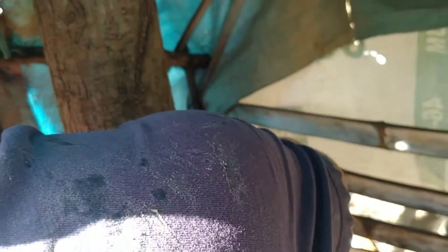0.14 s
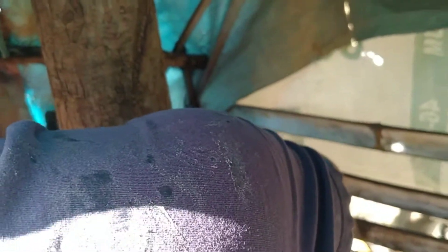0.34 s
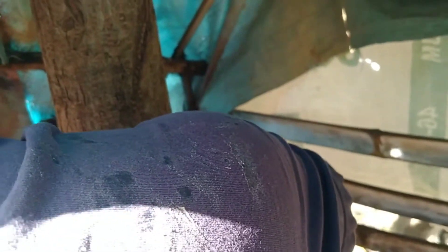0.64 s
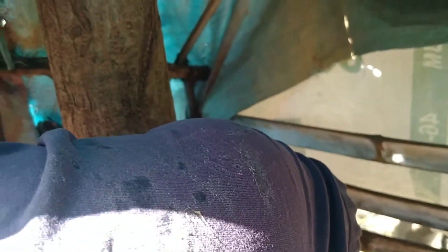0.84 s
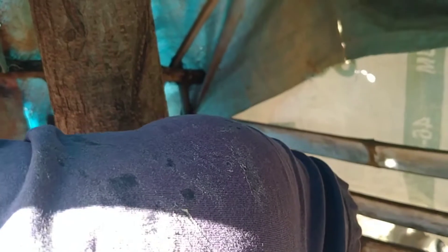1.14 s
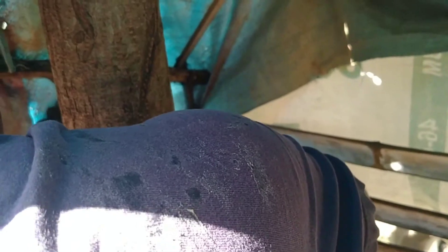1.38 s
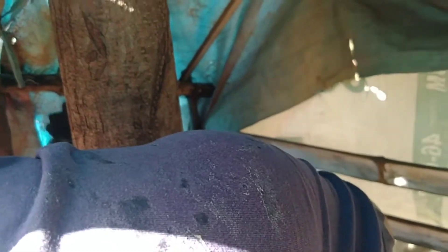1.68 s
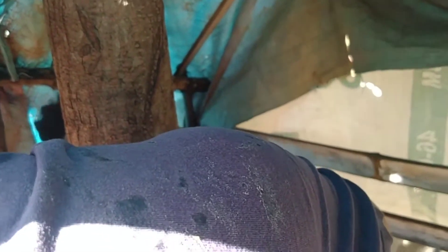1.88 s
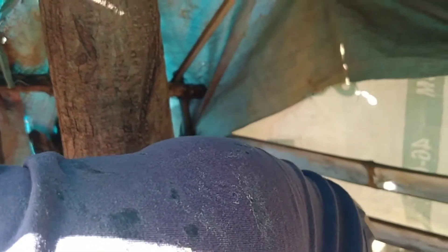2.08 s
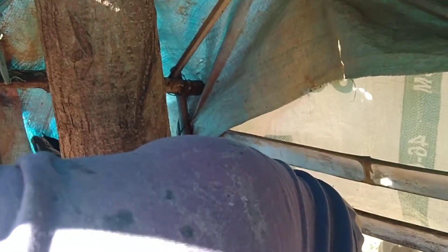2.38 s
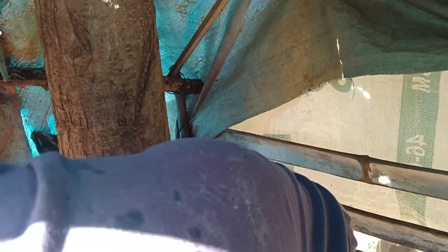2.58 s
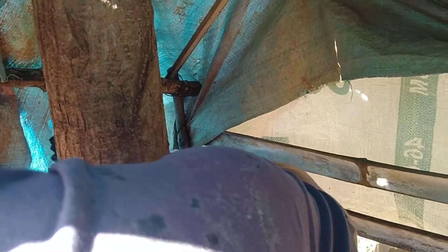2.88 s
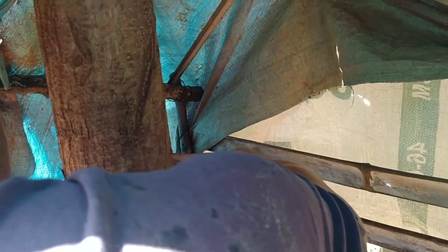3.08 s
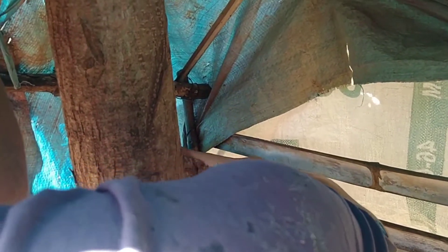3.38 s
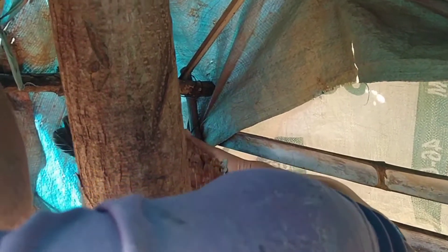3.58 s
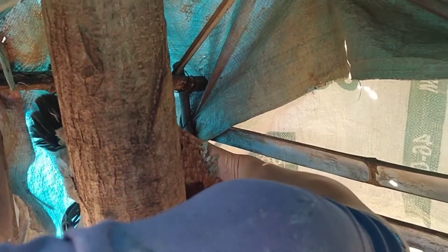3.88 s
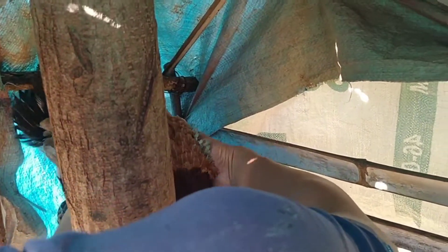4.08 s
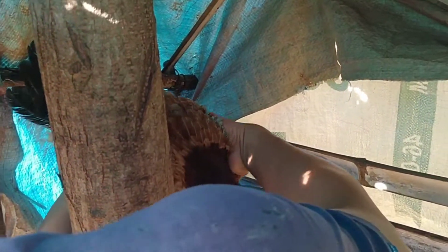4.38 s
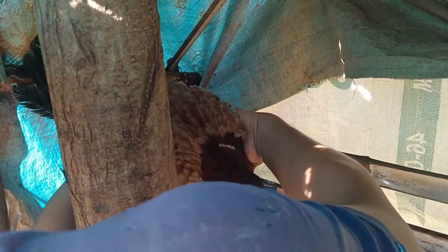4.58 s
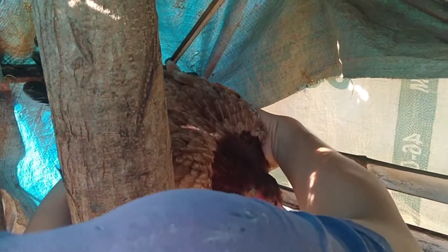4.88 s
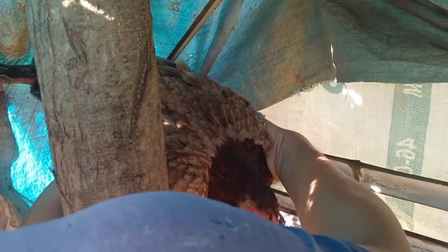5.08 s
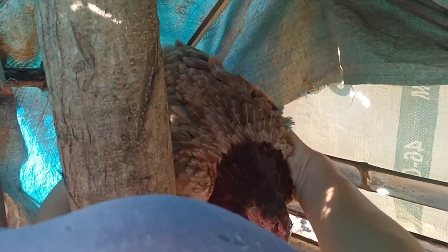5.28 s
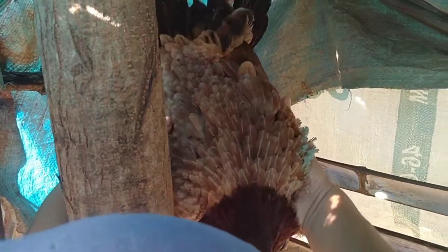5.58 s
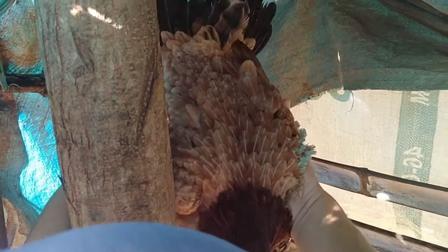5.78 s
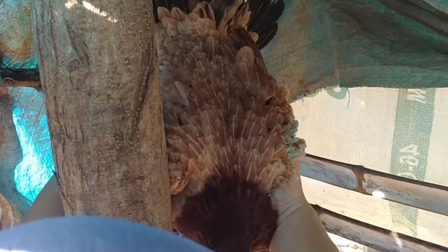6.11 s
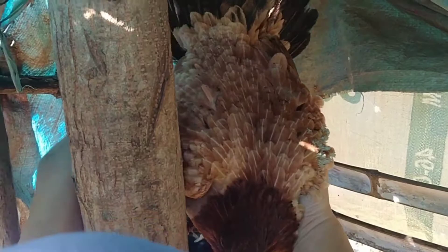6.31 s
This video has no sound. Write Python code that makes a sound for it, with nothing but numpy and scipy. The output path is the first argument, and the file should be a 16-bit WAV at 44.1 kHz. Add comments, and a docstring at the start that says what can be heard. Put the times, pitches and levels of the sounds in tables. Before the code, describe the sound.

A close microphone in a small tarpaulin coop picks up quiet outdoor air and a constant faint straw crackle. A short double cluck opens, then a hen growls at 0.3, 1.0, 1.9 and 2.8 seconds, each under half a second, a fast throaty flutter between a low and a brighter note. Chicks peep thinly and glide downward throughout, with brief trills near 1, 1.7 and 2.2. Very faint distant fowl calls come at 1.5 and 2.4. At 3.5 the longest growl, strong and nearly 0.8 seconds, comes with soft cloth rumble; clucks follow at 4.2. Peeps crowd in from 3.9 to 5.6. Another strong growl comes at 4.8, then one at 5.4 with a straw burst and sharp snap. A stuttering cluck at 5.8 precedes a small gritty scrape at 6.1 and a last low, weak, hoarse growl at 6.2, with a clear chick trill and rustling.

```python
"""Broody hen lifted off her nest

A hen growls eight times in a small tarpaulin coop, with throaty clucks between. Her voice is a whistle
that flutters 52 to 63 times a second between a low arching note and a higher one.
Chicks peep and trill as thin gliding whistles. Straw and feathers rustle as grainy filtered noise,
and clothing rumbles near the microphone as lumpy low noise. Steady air and two faint calls lie behind."""
import sys
import numpy as np
from scipy import signal
from scipy.fft import rfft, irfft, next_fast_len
from scipy.io import wavfile
from scipy.ndimage import map_coordinates

SR = 44100
rng = np.random.default_rng(int(sys.argv[2]) if len(sys.argv) > 2 else 0)


def wrap_up_sound(samples):
    """Save the sound to the file named by the first command line argument, as 16-bit audio."""
    columns = np.atleast_2d(samples).T
    # keep every value between -1 and 1, then stretch to whole-number steps
    tamed = np.clip(columns, -1, 1)
    steps = np.round(tamed * 32767).astype(np.int16)
    wavfile.write(sys.argv[1], SR, steps)


N = 284299  # length of the scene [samples]


def amp(db):
    """Turn decibels into gain."""
    return 10 ** (np.asarray(db) / 20)


def unit(x):
    """Scale a sound to an average (rms) strength of 1."""
    return x / np.sqrt(np.mean(x ** 2) + 1e-20)


def along(points, hz):
    """Read values between (frequency, value) points, on a logarithmic frequency axis."""
    point_hz, value = np.transpose(points)
    return np.interp(np.log(hz + 1), np.log(point_hz + 1), value)


def wobble(rate):
    """A smooth random curve with `rate` random points a second."""
    points = rng.standard_normal(int(N * rate / SR) + 4)
    return map_coordinates(points, [np.arange(N) * rate / SR])


def filtered(x, response):
    """Multiply the spectrum of x by a response that depends on frequency."""
    padded = next_fast_len(N + SR // 2)
    hz = np.fft.rfftfreq(padded, 1 / SR)
    return irfft(rfft(x, padded) * response(hz), padded)[:N]


def coloured(x, spectrum):
    """Shape the tone of x with a table of frequencies and levels."""
    return filtered(x, lambda hz: amp(along(spectrum, hz)))


def noise():
    """Plain random hiss as long as the scene."""
    return rng.standard_normal(N)


def add(track, s, sound):
    """Mix a sound into the track at time s."""
    part = track[max(round(s * SR), 0):][:len(sound)]
    part += sound[:len(part)]


def progress(length):
    """Run from 0 to 1 over a note of `length` seconds."""
    return np.linspace(0, 1, max(int(length * SR), 8))


def swell(u, fullness):
    """A rounded rise and fall; a small fullness makes it square."""
    return np.abs(np.sin(np.pi * u)) ** fullness


def strokes(rows):
    """A gain curve with one smooth hump for each (time, length, level) row."""
    gain = np.zeros(N)
    for s, length, db in rows:
        add(gain, s, amp(db) * swell(progress(length), 0.084))
    return gain


def whistle(hz, overtones_db, rough):
    """A tone with overtones, on a pitch path that trembles by the share rough."""
    tremble = np.interp(np.arange(len(hz)), np.linspace(0, len(hz), 14), rng.standard_normal(14))
    phase = 2 * np.pi * np.cumsum(hz * (1 + rough * tremble)) / SR
    # every note has the same phase at its middle, so successive notes stay in step with the flutter
    phase = phase - phase[len(hz) // 2]
    overtones = sum(amp(db) * np.sin(k * phase) for k, db in enumerate(overtones_db, 2))
    return np.sin(phase) + overtones


# Tone of the outdoor air: (frequency [Hz], relative level [dB per Hz])
AIR_COLOUR = [(20, 11.5), (50, 11.5), (120, 8.5), (200, -1), (900, -10), (1450, -1.5), (3000, -19),
              (4300, -5), (6300, -24), (7600, -23.5)]


def yard():
    """Steady outdoor air as shaped noise, and two faint drawn-out calls of a distant fowl."""
    drift_db = .6 * wobble(3)
    air = amp(-47.5 + drift_db) * unit(coloured(noise(), AIR_COLOUR))
    for s in [1.53, 2.36]:
        u = progress(.42)
        hz = 700 * (1 + .03 * swell(u, 1))
        # the octave is stronger than the fundamental
        add(air, s, amp(-64.0) * swell(u, 0.29) * whistle(hz, overtones_db=[11], rough=0.011))
    return air


# Shifts of clothing: (time [s], length [s], level [dB])
CLOTHING_SHIFTS = [(3.335, 0.057, -42.5), (3.5, 0.57, -45), (5.53, 0.076, -42.5)]
# Tone of the cloth rumble: (frequency [Hz], relative level [dB per Hz])
CLOTHING_COLOUR = [(20, -8.5), (50, -1.5), (120, -9.5), (220, -12.5), (450, -25.5), (1500, -53)]


def clothing():
    """Cloth shifting close to the microphone rumbles in soft lumps of low noise."""
    lumps = amp(2.5 * wobble(30))
    return strokes(CLOTHING_SHIFTS) * lumps * unit(coloured(noise(), CLOTHING_COLOUR))


# How long the coop's answer takes to die away by 60 dB: (frequency [Hz], time [s])
COOP_DECAY = [(200, 0.078), (1500, 0.24), (8000, 0.12)]
COOP_DB = -20  # gain of the coop's answer


def coop(x):
    """The short soft answer of tarpaulin and poles: a noise tail that fades differently at each pitch."""
    hz, t, z = signal.stft(rng.standard_normal(SR // 3), SR, nperseg=256)
    fade_db = -60 * t / along(COOP_DECAY, hz)[:, None]
    tail = signal.istft(z * amp(fade_db), SR, nperseg=256)[1]
    delayed = np.pad(x, (SR // 300, 0))
    return signal.fftconvolve(delayed, tail / np.linalg.norm(tail))[:N]


# Strokes through straw and feathers: (time [s], length [s], level [dB])
RUSTLES = [(.925, 0.1, -45.5), (1.92, 0.55, -53), (3.45, 0.71, -55), (5.42, 0.13, -41), (6.38, 0.44, -44.5)]
# Tone of the straw: (frequency [Hz], relative level [dB per Hz])
STRAW_COLOUR = [(400, 0), (2000, 3.5), (3500, -4), (5100, -4), (7600, -12.5)]
# Straw snaps: (time [s], approximate peak level [dB])
STRAW_SNAPS = [(0.28, -22), (0.738, -27), (0.989, -22), (2.3232, -32), (2.3767, -22.5), (2.8884, -20.5),
               (4.207, -28), (4.698, -36), (5.455, -15.5), (5.4788, -28)]


def nest():
    """Straw and feathers crackle in tiny random grains, with a few sharper bursts of noise as snaps."""
    grains = noise() * (rng.random(N) < 1000 / SR)  # about 1000 grains a second
    crackle = unit(coloured(unit(grains) + 0.86 * noise(), STRAW_COLOUR))
    snaps, t = np.zeros(N), np.arange(SR // 20) / SR
    for s, db in STRAW_SNAPS:
        # noise peaks rise well above its average, so start lower; fades 60 dB in 0.031 s
        add(snaps, s, amp(db - 13.0 - 60 * t / 0.031) * rng.standard_normal(len(t)))
    strength = strokes(RUSTLES) + amp(-51.5)  # a faint crackle never stops
    return strength * amp(2.24 * wobble(25)) * crackle + snaps


# A short dry scrape as the hen comes free of the nest: (time [s], length [s], level [dB])
SCRAPE_STROKES = [(6.125, 0.083, -44.5)]
# Tone of the scrape: (frequency [Hz], relative level [dB per Hz])
SCRAPE_TONE = [(900, -15), (1700, 11), (2600, 8), (3100, 7), (3600, -28), (8000, -32)]


def scrape():
    """A gritty rub of shaped noise, duller than the straw."""
    return strokes(SCRAPE_STROKES) * unit(coloured(noise(), SCRAPE_TONE))


# Falling peeps: (time [s], length [s], top pitch [Hz], share of the pitch lost [0-1], level [dB])
CHICK_PEEPS = [(0.369, 0.055, 4530, 0.44, -40.5), (0.712, 0.03, 4200, 0.15, -43.5),
               (0.869, 0.053, 4420, 0.23, -40.5), (1.089, 0.037, 4440, 0.19, -47),
               (1.29, 0.04, 3140, 0.13, -42), (1.404, 0.073, 4650, 0.24, -42.5),
               (1.777, 0.043, 4480, 0.15, -45.5), (2.491, 0.058, 4590, 0.34, -41),
               (2.742, 0.077, 4690, 0.39, -41), (2.938, 0.033, 4710, 0.39, -34.5),
               (3.225, 0.052, 3390, 0.25, -37.5), (3.368, 0.052, 3940, 0.41, -43.5),
               (3.866, 0.06, 3850, 0.18, -44), (3.996, 0.046, 3900, 0.16, -39),
               (4.126, 0.078, 3960, 0.55, -40), (4.315, 0.04, 3830, 0.43, -37.5),
               (4.36, 0.062, 3850, 0.24, -45), (4.42, 0.047, 4320, 0.18, -39),
               (4.654, 0.035, 4560, 0.23, -42), (4.762, 0.032, 4170, 0.28, -35.5),
               (4.852, 0.057, 4700, 0.29, -39.5), (5.205, 0.053, 3810, 0.18, -38.5),
               (5.256, 0.041, 4120, 0.37, -43), (5.288, 0.027, 4070, 0.21, -39),
               (5.321, 0.042, 3450, 0.43, -40), (5.341, 0.053, 3920, 0.15, -32.5),
               (5.516, 0.059, 4046, 0.12, -29.5), (5.584, 0.065, 3730, 0.26, -40)]
# Trills and held notes: (time [s], length [s], centre pitch [Hz], warbles [per s],
#                         warble depth [share of pitch], level [dB])
CHICK_TRILLS = [(0.934, 0.065, 5100, 30, 0, -36), (1.1, 0.061, 4770, 30, 0.15, -36.5),
                (1.688, 0.056, 5180, 28, 0.09, -35), (2.152, 0.032, 4150, 37, 0, -37),
                (6.096, 0.085, 4560, 31, 0.11, -45), (6.356, 0.083, 4210, 36.5, 0.12, -28.5)]
# in trills the other side of the syrinx (the bird's voice box) joins in
SECOND_VOICE, SECOND_VOICE_DB = 0.91, -8.5  # pitch ratio, level under the first voice [dB]


def chicks():
    """Thin peeps that start level and drop ever faster, and trills that warble as they sink."""
    out = np.zeros(N)
    for s, length, top_hz, drop, db in CHICK_PEEPS:
        u = progress(length)
        peep = whistle(top_hz * (1 - drop * u ** 2), overtones_db=[-27], rough=0.011)
        add(out, s, amp(db) * swell(u ** 0.78, 0.56) * peep)
    for s, length, centre_hz, rate, depth, db in CHICK_TRILLS:
        u = progress(length)
        warble = depth * np.cos(2 * np.pi * rate * length * (u - 1) + .6)
        sink = .07 * (.5 - u)
        hz = centre_hz * (1 + warble + sink)
        first = whistle(hz, overtones_db=[], rough=0.038)
        second = whistle(SECOND_VOICE * hz, overtones_db=[], rough=0.069)
        add(out, s, amp(db) * swell(u ** 0.63, 0.5) * (first + amp(SECOND_VOICE_DB) * second))
    return out


# the flutter settles to this many cycles a second, over about this time [s]
REST_RATE, SLOWING_S = 52, 0.3
# Throaty clucks: (time [s], length [s], middle pitch [Hz], level before the throat [dB])
HEN_CLUCKS = [(0.046, 0.0128, 488, -23), (0.058, 0.027, 788, -29.5), (4.184, 0.036, 889, -21.5),
              (4.243, 0.014, 830, -24), (4.256, 0.0158, 499, -21.5), (5.124, 0.043, 830, -26),
              (5.786, 0.062, 732, -17.5), (5.846, 0.0055, 624, -20)]
CATCH_LOSS_DB = 4.5  # each catch of a stuttering cluck is this much weaker


def clucks():
    """Throaty falling notes; a long one stutters near the flutter rate, each catch weaker than the last."""
    voice = np.zeros(N)
    for s, length, pitch_hz, db in HEN_CLUCKS:
        catches = max(round(length * REST_RATE), 1)
        u = progress(length / catches)
        for k in range(catches):
            note = whistle(pitch_hz * (1 + 0.1 * (.5 - u)), overtones_db=[-7, -18], rough=0.13)
            add(voice, s + k * length / catches, amp(db - CATCH_LOSS_DB * k) * swell(u, 0.9) * note)
    return voice


def gruff_note(pitch, length, rough):
    """A short hoarse trough in pitch, with a strong octave."""
    u = progress(length)
    hz = pitch * (1 + .2 * (2 * u - 1) ** 2)
    return unit(swell(u, 1) * whistle(hz, [-12, -22], rough))


def high_note(pitch, length, rough, bright_db):
    """Between the low notes the voice flips up to a brighter, steadier note."""
    u = progress(length)
    hz = pitch * (1 + .035 * (.5 - u))
    return unit(swell(u, .55) * whistle(hz, np.array([-11, -22]) + bright_db, rough * .3))


SWEEP = 0.83  # brief low notes sweep steeply down from the high one


def low_note(pitch, length, share, sag, rough, bright_db):
    """A brief note is a pointed downward sweep; a long one is a flat-topped arch with sagging ends."""
    u = progress(length)
    arch = sag * (.1 - np.abs(2 * u - 1) ** 2.83)
    sweep = SWEEP * (1 - share) ** 3 * (.5 - u)
    fullness = max(2.4 - 1.83 * share, .3)
    tone = whistle(pitch * (1 + arch + sweep), np.array([-23, -33, -31]) + bright_db, rough * .55)
    return unit(swell(u ** .9, fullness) * tone)


RATTLE_DB, RATTLE_ROUGH = -16.5, 0.058  # level under the low note's [dB], roughness [share of pitch]


def rattle(hz, length):
    """A thin upper resonance that rattles with each low note."""
    u = progress(length)
    return amp(RATTLE_DB) * swell(u, 1.4) * whistle(np.full(len(u), hz), [], RATTLE_ROUGH)


# the pitch leaps up as the call opens [s, s], then sinks slowly [Hz per s]
LEAP_AT_S, LEAP_WIDTH_S, SAG_HZ_PER_S = 0.06, 0.08, 7.7
SWELL_DB = 8  # the low note starts this far under its full level
HIGH_RISE_S, HIGH_RISE_DB = 0.068, 10  # the high note comes in early, then its level changes steadily
# the call runs out: lower, weaker, rougher; the pitch gives way over about DROOP_S
FRAY_S, FRAY_DROOP, FRAY_DB, FRAY_ROUGH, DROOP_S = 0.018, 0.26, 6.5, 0.25, 0.022
HIGH_FRAY_DB = 23.5  # the high note gives out before the low one
WANDER, WANDER_PER_S = 0.0073, 15  # unsteadiness of pitch [share], its random points [per s]
# over a call the low notes lengthen unevenly, until they can run together [share of a cycle]
SHARE_GROWTH, SHARE_SCATTER = 0.42, 0.045
SCATTER_DB, COLOUR_SCATTER_DB = 1.1, 2.2  # strength and brightness differ from cycle to cycle
# pitch of the gruff note over the low note's; share by which it drags the low note down
SLIP_PITCH, SLIP_PULL = 0.757, 0.036
# The voice slips to a gruff note between flutters: (time [s], length [s], level before the throat [dB])
GRUFF_SLIPS = [(1.21, 0.037, -39), (2.18, 0.04, -32.5), (3.88, 0.13, -33), (4.04, 0.064, -38),
               (5.0, 0.115, -34), (5.585, 0.14, -33.5)]
# The high note flares up again late in a call: (time [s], length [s], level before the throat [dB])
HIGH_FLARES = [(4.14, 0.085, -37), (5.725, 0.043, -37)]


def growl(start, length, pitch_hz, leap, db, swell_s, mean_share, high_hz, high_peak_db, fade_db_per_s,
          rate, roughness, bright_db, rattle_hz):
    """Flutter between low and high notes; low ones swell and lengthen, and the call droops and frays."""
    voice, slips, flares = np.zeros(N), strokes(GRUFF_SLIPS), strokes(HIGH_FLARES)
    pitch_drift = rng.standard_normal(32)
    t = 0
    for chance in rng.standard_normal((64, 6)):  # one row of random differences for each cycle
        if t > length:
            break
        u = t / length
        period = 1 / (REST_RATE + (rate - REST_RATE) * np.exp(-t / SLOWING_S))
        centre = start + t  # middle of the low note
        gap = centre + period / 2  # middle of the high note
        now = min(int(gap * SR), N - 1)
        fray = np.exp((t - length) / FRAY_S)

        low_db = db - SWELL_DB * max(1 - t / swell_s, 0) - FRAY_DB * fray + SCATTER_DB * chance[3]
        high_db = high_peak_db - HIGH_RISE_DB * max(1 - t / HIGH_RISE_S, 0)
        high_db -= fade_db_per_s * max(t - HIGH_RISE_S, 0) + HIGH_FRAY_DB * fray
        rough = roughness + FRAY_ROUGH * fray
        colour_db = bright_db + COLOUR_SCATTER_DB * chance[5]

        drift = np.interp(t * WANDER_PER_S, np.arange(len(pitch_drift)), pitch_drift)
        pitch = pitch_hz - SAG_HZ_PER_S * t
        pitch *= 1 + leap * np.exp(-((t - LEAP_AT_S) / LEAP_WIDTH_S) ** 2)
        pitch *= 1 - FRAY_DROOP * np.exp((t - length) / DROOP_S)
        pitch *= 1 + WANDER * drift + 0.12 * rough * chance[1] - SLIP_PULL * (slips[now] > 0)

        # the more of the cycle the low note takes, the deeper it arches
        share = np.clip(mean_share + SHARE_GROWTH * (u - .5) + SHARE_SCATTER * chance[0], .2, .95)
        sag = min(0.35 * share ** 2.4 * np.exp(0.25 * chance[2]), .7)
        low = period * (share + .15)  # note lengths [s]
        high = period * max(1.3 - share, .5)

        # a shorter note is made louder, so that it carries the same energy
        low_size = amp(low_db) * np.sqrt(period / low)
        add(voice, centre - low / 2, low_size * low_note(pitch, low, share, sag, rough, colour_db))
        add(voice, centre - low / 2, low_size * rattle(rattle_hz, low))
        high_size = (amp(high_db + SCATTER_DB * chance[4]) + flares[now]) * np.sqrt(period / high)
        high_pitch = high_hz * (1 + 0.031 * (.5 - u))
        add(voice, gap - high / 2, high_size * high_note(high_pitch, high, rough, colour_db))
        gruff = gruff_note(SLIP_PITCH * pitch, period / 2, rough)
        add(voice, gap - period / 4, slips[now] * gruff)
        t += period
    return voice


# Growls: (time [s], length [s], base pitch [Hz], opening leap [share of pitch],
#          low note's level before scatter and throat [dB], swell [s], low note's mean share of a cycle [0-1],
#          high note's pitch [Hz], its level before scatter and throat [dB],
#          its fading [dB per s; negative grows], opening flutter rate [per s],
#          base roughness [0-1], overtone brightness [dB], rattle pitch [Hz])
HEN_GROWLS = [(0.309, 0.43, 1104, 0.29, -34, 0.19, 0.53, 1904, -33, 23, 60, 0.21, -3.5, 4330),
              (1.046, 0.44, 1050, 0.16, -31.5, 0.027, 0.55, 1790, -33.5, 19, 59.8, 0.18, 2.5, 4330),
              (1.923, 0.4, 1082, 0.11, -31, 0.25, 0.59, 1747, -33, 33, 61, 0.14, 8, 4450),
              (2.786, 0.26, 1113, 0, -28.5, 0.19, 0.57, 1863, -43.5, 7, 57.5, 0.12, 4, 4420),
              (3.483, 0.78, 1137, 0.037, -25.5, 0.13, 0.75, 1848, -27.5, 37, 63.3, 0.12, 6, 4356),
              (4.779, 0.36, 1297, 0, -25, 0.11, 0.78, 1763, -39.5, 39, 57.8, 0.12, -3.5, 4650),
              (5.422, 0.39, 1186, 0.067, -29, 0.018, 1, 1880, -51.5, 6, 60, 0.12, 3.5, 4260),
              (6.17, 0.44, 938, 0.11, -35, 0.005, 1, 1530, -45.5, -1, 58, 0.44, -8, 3880)]
# Tone of the hen's throat: (frequency [Hz], gain [dB])
THROAT_COLOUR = [(300, -22.5), (800, -1), (1000, 0), (1200, 2), (1550, -5), (1800, -1), (2400, -1.5),
                 (2900, -8.5), (3450, -12.5), (3800, -2.5), (4600, -0.5), (5100, -8.5), (8000, -8.5)]


def hen():
    """Growls and clucks, with a little hoarse air riding on them, shaped by the throat."""
    voice = sum(growl(*row) for row in HEN_GROWLS) + clucks()
    hoarse_air = unit(coloured(noise(), [(400, -15.0), (1500, -0.5), (8000, -25.0)]))
    return coloured(voice + amp(-28) * voice * hoarse_air, THROAT_COLOUR)


def scene():
    """Birds and straw inside the coop, over the background."""
    near = hen() + chicks() + nest() + scrape()
    return (near + amp(COOP_DB) * coop(near) + clothing() + yard())[None]


TOP_HZ = 8150  # band limit of the recorder


def record(dry):
    """The recorder cuts off steeply above its band limit."""
    return filtered(dry[0], lambda hz: 1 / np.sqrt(1 + (hz / TOP_HZ) ** 120))[None]


dry = scene()
out = record(dry)
wrap_up_sound(out)
```